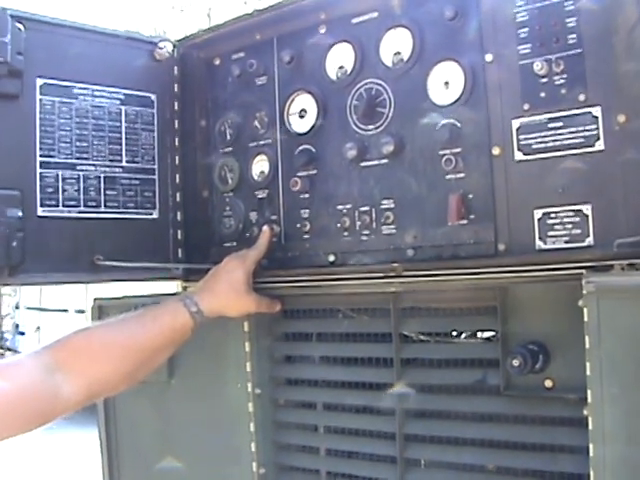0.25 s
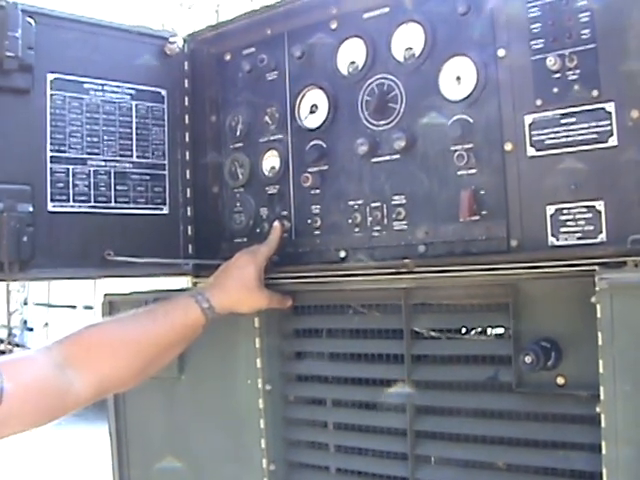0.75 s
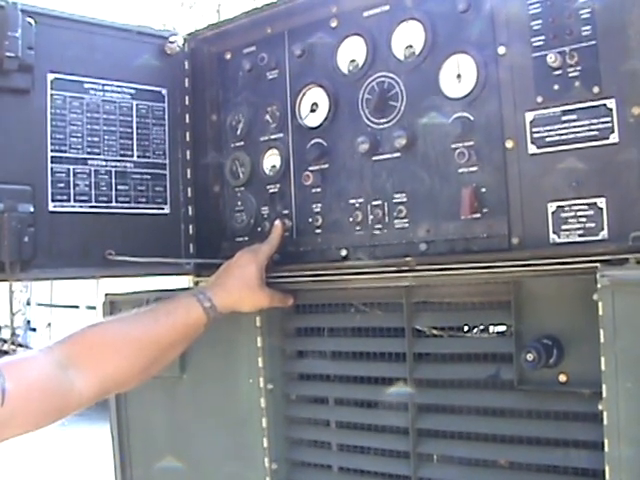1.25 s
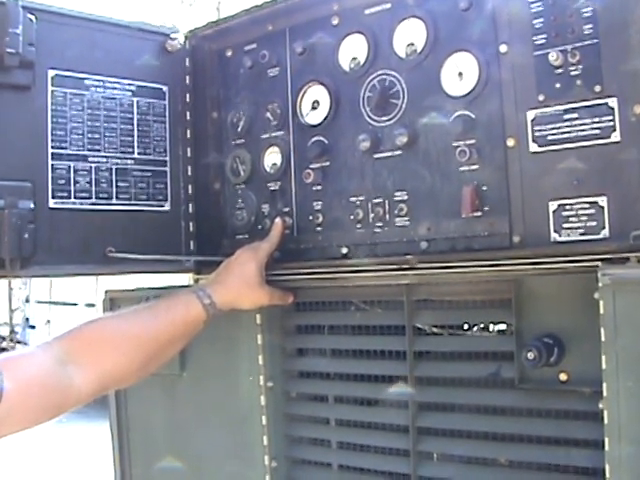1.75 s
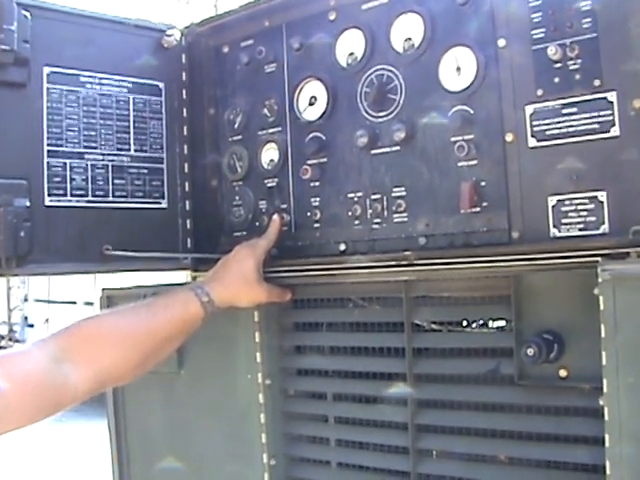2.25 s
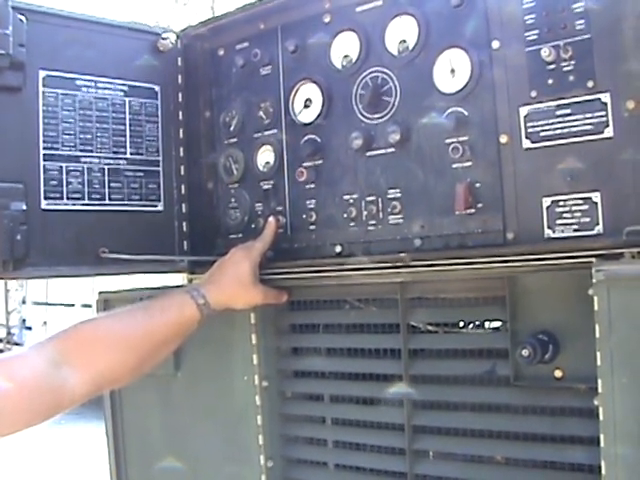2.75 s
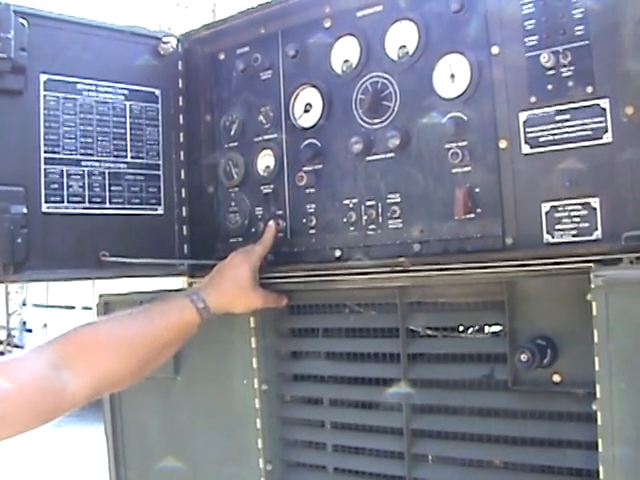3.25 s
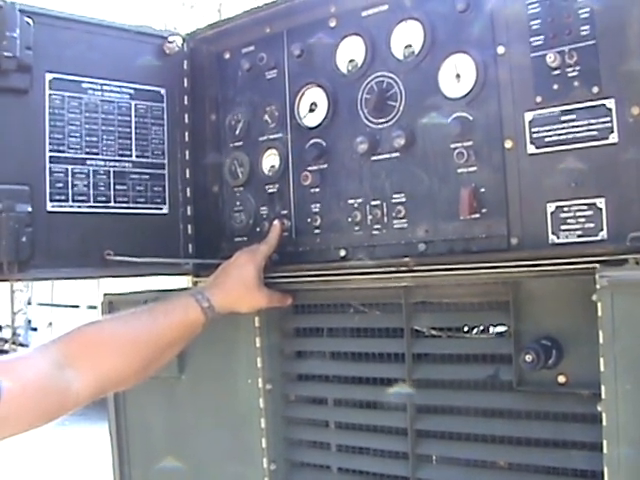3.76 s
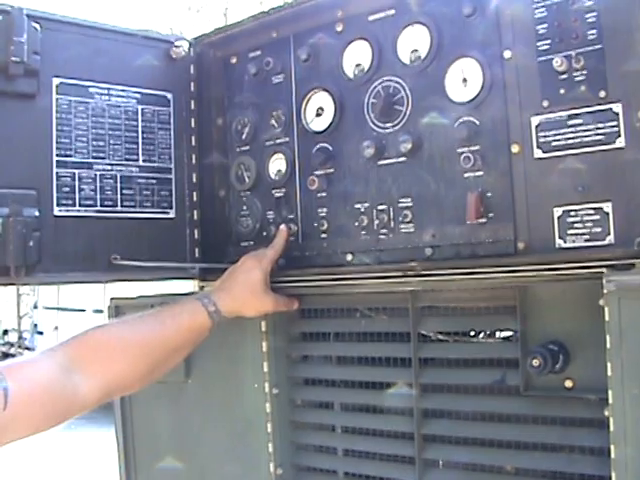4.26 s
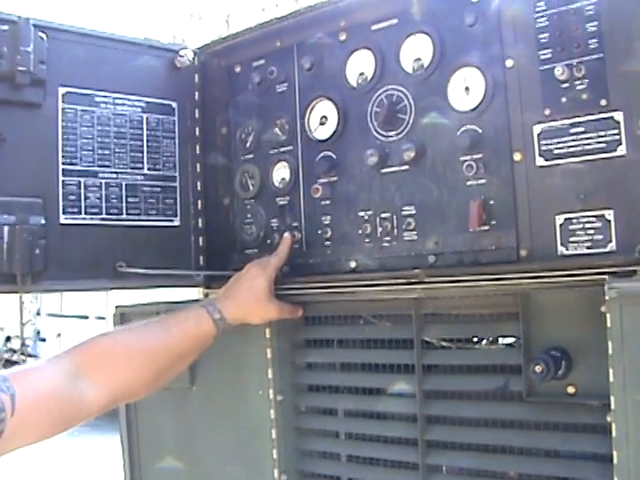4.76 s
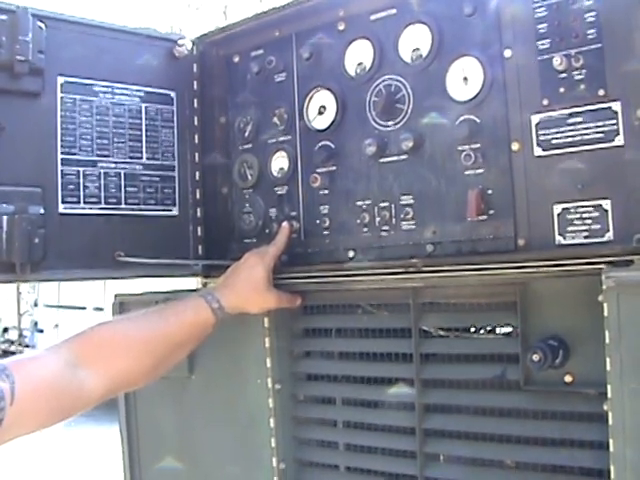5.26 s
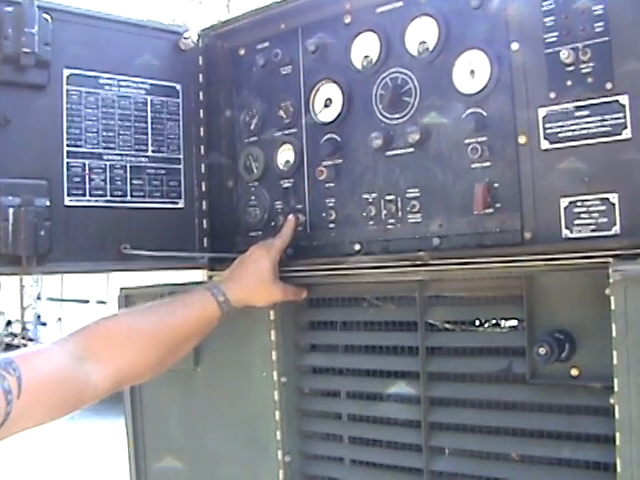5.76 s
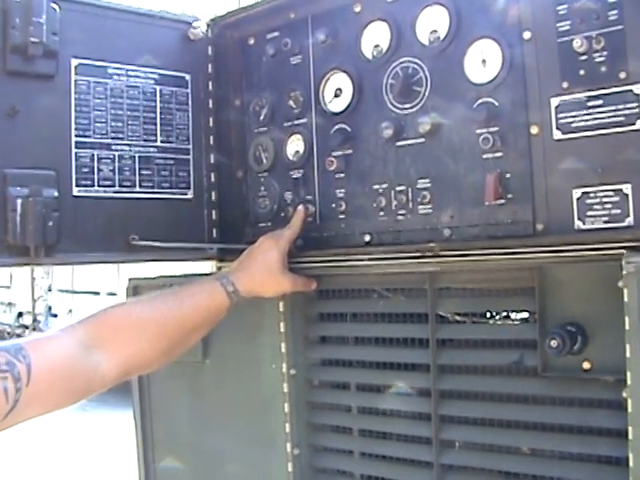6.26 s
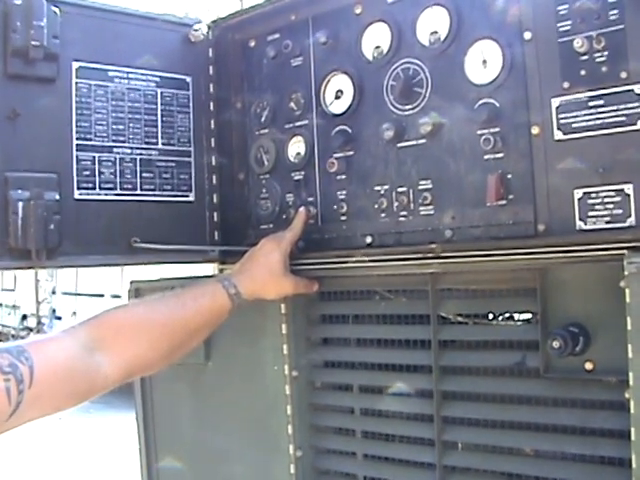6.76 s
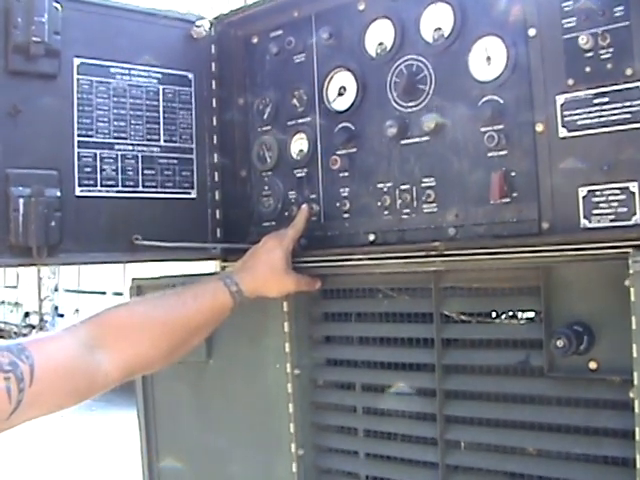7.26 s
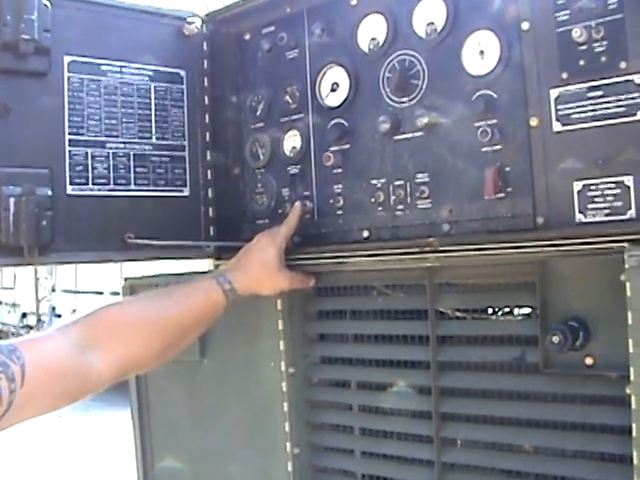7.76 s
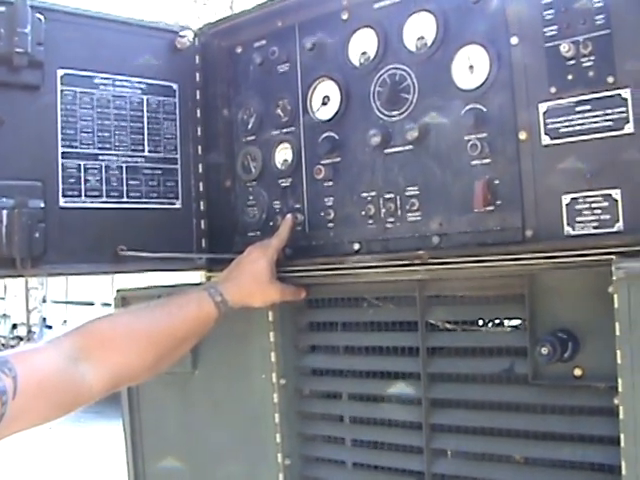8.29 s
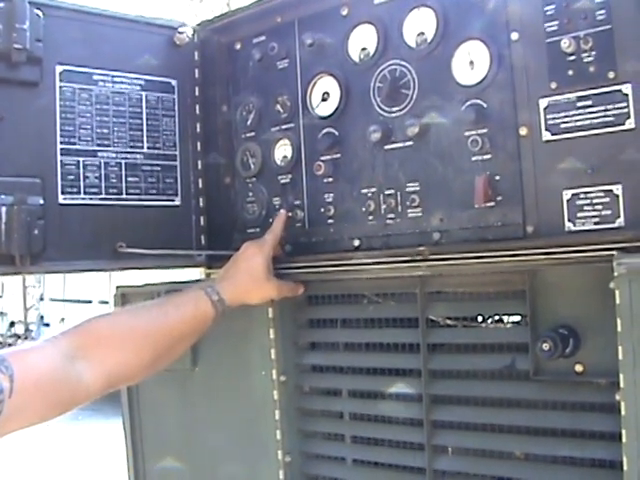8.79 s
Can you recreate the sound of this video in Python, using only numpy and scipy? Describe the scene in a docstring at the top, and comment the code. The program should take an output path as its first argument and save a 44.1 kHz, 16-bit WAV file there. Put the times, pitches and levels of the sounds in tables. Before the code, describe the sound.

A close, loud diesel generator revs up just after starting, then settles into a steady, clattering idle.

```python
"""A six-cylinder diesel generator has just caught: it overshoots, then the governor settles it to idle. The
exhaust drones and barks twice, firings knock the block, injectors tick, the valve gear clatters, the fan rushes
and a steel panel rings. A thin hiss swells as the speed settles; later, loose metal scrapes twice. Heard close
to the louvred steel housing, loud, its peaks held flat at full scale."""
import sys
import numpy as np
from scipy import signal
from scipy.fft import rfft, irfft
from scipy.io import wavfile
from scipy.ndimage import uniform_filter1d, minimum_filter1d

SR = 44100
rng = np.random.default_rng(int(sys.argv[2]) if len(sys.argv) > 2 else 0)


def dump_mix(stems):
    """Bounce the given channels to the path in sys.argv[1] as a 16-bit WAV at rate SR."""
    frames = np.atleast_2d(stems).T  # one column per channel
    limited = np.clip(frames, -1, 1)  # hard clip at full scale
    pcm = np.round(limited * 32767).astype(np.int16)
    wavfile.write(sys.argv[1], SR, pcm)


N = 398223
TIME_S = np.arange(N) / SR
BINS_HZ = np.maximum(np.arange(N // 2 + 1) * SR / N, 1)
IDLE_FIRING_HZ, WARMUP_S = 58.9505, 5.5


def undb(db):
    """Decibels to gain."""
    return 10 ** (np.asarray(db) / 20)


def unit(x):
    """Scale to unit rms."""
    return x / np.sqrt(np.mean(x ** 2))


def contour(table):
    """Columns of a frequency table, interpolated on a log axis."""
    hz, *columns = np.transpose(table)
    return [np.interp(np.log(BINS_HZ), np.log(hz), column) for column in columns]


def filtered(x, response):
    """Apply a frequency response."""
    return irfft(rfft(x) * response, N)


def noise(response):
    """Coloured noise, unit rms."""
    return unit(filtered(rng.standard_normal(N), response))


def walk(rate_hz):
    """Smooth random drift, unit rms."""
    return noise(np.exp(-BINS_HZ / rate_hz))


def resonance(f, hz, width_hz):
    """One damped mode, unit gain at its centre."""
    return 1 / (1 + 1j * (f * f - hz * hz) / (f * width_hz))


def reflections(decay_s):
    """Response of a dense, fading echo cluster with unit energy."""
    t = np.arange(SR // 5) / SR
    echoes = rng.standard_normal(len(t)) * np.exp(-t / decay_s)
    return rfft(echoes / np.linalg.norm(echoes), N)


def governor(t, swing_hz=28.686, half_period_s=2.2424, settle_s=0.4522, drag_hz=0.9261, thin_s=1.8665):
    """Firing rate in Hz: a damped overshoot, then a creep up to idle as the cold oil thins."""
    swing = swing_hz * np.exp(-t / settle_s) * np.sin(np.pi * t / half_period_s)
    return IDLE_FIRING_HZ + swing - drag_hz * np.exp(-t / thin_s)


def fuel_db(start_db=0.5, start_s=0.085, cut_db_per_hz=2.4, lag_s=0.12):
    """Fuel per firing against idle: rich at the start, then cut, a little late, on overspeed."""
    overspeed_hz = np.maximum(governor(np.maximum(TIME_S - lag_s, 0)) - IDLE_FIRING_HZ, 0)
    return start_db * np.exp(-(TIME_S / start_s) ** 2) - cut_db_per_hz * overspeed_hz


def drive_db(idle_db, db_per_fuel_db, cold_db):
    """A part's drive follows the fuel and shifts as the engine warms."""
    return idle_db + db_per_fuel_db * fuel_db() + cold_db * np.exp(-TIME_S / WARMUP_S)


def blows(firings, table, decay_s, rise_s, rel_width, floor_db, tone_db, fresh_db, scatter_db, jitter_s):
    """Blows recurring every six firings: one mode plus a noisy crowd, slightly different each time."""
    size = 4096
    t = np.arange(size) / SR
    f = np.maximum(np.arange(size // 2 + 1) * SR / size, 1)
    envelope = np.exp(-t / decay_s) * (1 - np.exp(-t / rise_s))
    cycles = np.arange(int(firings[-1] / 6) + 1) * 6
    out = np.zeros(N + size)
    for place, db, cold_db, hz in table:
        late, strength = rng.standard_normal((len(cycles), 2)).T
        starts = np.interp(cycles + place, firings, np.arange(N), right=2 * N) + jitter_s * SR * late
        grain = rng.standard_normal(size) + undb(fresh_db) * rng.standard_normal((len(cycles), size))
        colour = undb(floor_db) + np.abs(resonance(f, hz, rel_width * hz))
        crowd = unit(irfft(rfft(grain) * colour, size))
        mode = np.sqrt(2) * np.sin(2 * np.pi * hz * t)
        rings = unit(envelope * (crowd + undb(tone_db) * mode))
        gains = undb(db + cold_db * np.exp(-starts / SR / WARMUP_S) + scatter_db * strength)
        for start, ring, gain in zip(np.maximum(starts, 0).astype(int), rings, gains):
            if start < N:
                out[start:start + size] += gain * ring
    return out[:N]


# Silencer tones. Each drive: warm idle in dB, dB per dB of fuel, cold offset in dB.
HUM_DRIVE = (-20, 0.35, 0.88)
BOOM_DRIVE = (-14, -0.21, -0.24)
OVERTONE_DRIVE = (-18, 0.1, -5)
# Exhaust and frame shake. Each row: whole or half crank order, idle level in dB, racing level in dB.
DRONE_ORDERS = [(3, -31, -32), (4, -40, -40), (4.5, -41, -36), (5, -32, -28), (5.5, -35.5, -46),
                (7, -38, -30), (8.5, -51, -36), (10, -38.5, -33), (10.5, -47, -26.5), (11, -34, -45),
                (13, -48, -42), (13.5, -30, -29.5), (14, -35.5, -36), (14.5, -40, -37), (16, -37, -35),
                (17, -37, -37), (18, -36, -32.5), (21, -42.5, -50), (24, -35.5, -51)]


def exhaust(firing_hz, crank_rad, pipe_hz=183.9, pipe_width_hz=14.7, waver_db=0.35):
    """Four-stroke drone; the silencer sounds at two, three and four times the firing rate."""
    hum = undb(drive_db(*HUM_DRIVE)) * np.sin(6 * crank_rad)
    overtone = undb(drive_db(*OVERTONE_DRIVE)) * np.sin(12 * crank_rad)
    pipe_gain = np.abs(resonance(3 * firing_hz, pipe_hz, pipe_width_hz))
    # A quarter-cycle lag smooths the pulses into a drone.
    boom = -undb(drive_db(*BOOM_DRIVE)) * pipe_gain * np.cos(9 * crank_rad)
    racing = np.clip((firing_hz - 59) / 4, 0, 1)
    out = hum + boom + overtone
    for order, idle_db, racing_db in DRONE_ORDERS:
        wave = np.sin(order * crank_rad + rng.uniform(0, 2 * np.pi))
        out += undb(idle_db + racing * (racing_db - idle_db)) * wave
    return np.sqrt(2) * out * undb(waver_db * walk(16))


# Block and cover modes. Each row: frequency in Hz, width in Hz, relative level in dB.
BLOCK_MODES = [(668, 21, 0.5), (807, 17, 7), (986, 48, 1.5), (1034, 37, 0.5), (1133, 34, 0.5),
               (1203, 25, 3), (1462, 40, 0.5), (1634, 77, -1), (1724, 90, -4), (1940, 95, -7)]
# Blows of one cycle. Each row: place in firings, relative level in dB, cold offset in dB, centre in Hz.
KNOCK_BLOWS = [(0.198, -2.5, 1, 1018), (0.77, -1, 0, 1110), (1.299, 0, -5.5, 1006), (1.619, 0, 4.5, 983),
               (2.48, -3, 4.5, 997), (2.87, -4.5, 6.5, 1120), (3.45, -2, -2, 985), (3.88, -4, 2, 1203),
               (4.68, 3.5, -6, 988), (5.15, -1, -1.5, 1110)]
COVER_BLOWS = [(0.652, 0.5, 6, 1738), (1.35, 1, 3.5, 687), (1.849, 2, -2, 1605), (2.619, -1.5, 0, 1620),
               (3.548, 0, -4, 1610), (4.151, 3, -8, 1480), (4.75, 2, 2, 1810), (5.378, 0, 3.5, 1718)]
# Each drive: warm idle in dB, dB per dB of fuel, cold offset in dB.
KNOCK_DRIVE = (-18, 1, -0.4)
COVER_DRIVE = (-24.5, 0.15, 1.5)


def combustion(firings):
    """Diesel knock rings the block and sets its sheet-metal covers pinging."""
    power = sum(np.abs(undb(db) * resonance(BINS_HZ, hz, width)) ** 2 for hz, width, db in BLOCK_MODES)
    block = np.sqrt(power)
    knocks = blows(firings, KNOCK_BLOWS, decay_s=0.0065, rise_s=0.0044, rel_width=0.2,
                   floor_db=-16.5, tone_db=1.5, fresh_db=-7, scatter_db=1, jitter_s=2e-5)
    pings = blows(firings, COVER_BLOWS, decay_s=0.007, rise_s=0.0015, rel_width=0.13,
                  floor_db=-19, tone_db=-11, fresh_db=-19.5, scatter_db=0.5, jitter_s=2e-5)
    knocks = unit(filtered(knocks, block)) * undb(drive_db(*KNOCK_DRIVE))
    pings = unit(filtered(pings, block)) * undb(drive_db(*COVER_DRIVE))
    return knocks + pings


# Valve and injector spectrum. Each row: frequency in Hz, relative gain in dB.
CLATTER_SPECTRUM = [(150, -27), (330, 7.5), (550, -5), (850, 0), (1350, -2.5), (1800, 1), (2700, -3),
                    (3600, -7), (5400, -13), (7800, -16), (10000, -23.5), (15500, -40)]
# Taps of one cycle. Each row: place in firings, relative level in dB, cold offset in dB, centre in Hz.
VALVE_BLOWS = [(0.098, 1.5, 2.5, 2466, ), (0.621, 0, 0.5, 377), (1.2, 4.5, -1.5, 5120), (1.9, 4, -5, 2703),
               (2.902, 1.5, 1.5, 409), (3.45, 2, 5, 3720), (4.0, 4, -0.5, 3234), (4.701, 2, 1, 2184),
               (5.48, 3, 2, 4330)]
# Warm idle in dB, dB per dB of fuel, cold offset in dB.
VALVE_DRIVE = (-21, 0.3, 0.56)


def valve_gear(firings, surge_db=0.54, edge_per_knock=0.96, edge_hz=7500):
    """Bright taps of wandering force; harder firing sharpens their edge."""
    taps = blows(firings, VALVE_BLOWS, decay_s=0.015, rise_s=0.001, rel_width=1,
                 floor_db=4.5, tone_db=-18.5, fresh_db=-9, scatter_db=1.93, jitter_s=1e-5)
    taps = unit(filtered(taps, undb(contour(CLATTER_SPECTRUM)[0])))
    edge = filtered(taps, 1 / (1 + (edge_hz / BINS_HZ) ** 4))
    knock_db = drive_db(*KNOCK_DRIVE)
    taps += edge * (undb(edge_per_knock * (knock_db - knock_db[-1])) - 1)
    return taps * undb(drive_db(*VALVE_DRIVE) + surge_db * walk(17))


# Ticks of one cycle. Each row: place in firings, relative level in dB, cold offset in dB, centre in Hz.
INJECTOR_BLOWS = [(0.121, 0.5, -6, 3880), (0.35, 3, 2, 5380), (1.65, -1, -16, 2356), (1.951, -12, -5, 2870),
                  (3.62, -3.5, 8, 2284), (3.979, 4, -3.5, 3300), (4.199, 5, -2, 5430),
                  (4.738, 1.5, 0, 2154), (5.139, -1, -1, 2400), (5.5, 6.5, 0, 4203), (5.721, 1, 3, 3820)]
# Warm idle in dB, dB per dB of fuel, cold offset in dB.
INJECTOR_DRIVE = (-29, 0.05, 0.88)


def injectors(firings, highpass_hz=1500):
    """Hard ticks, bunched in the second half of each cycle, give the diesel its beat."""
    ticks = blows(firings, INJECTOR_BLOWS, decay_s=0.0072, rise_s=0.00058, rel_width=0.35,
                  floor_db=-30, tone_db=-3, fresh_db=-7, scatter_db=1.2, jitter_s=1e-5)
    colour = undb(contour(CLATTER_SPECTRUM)[0]) / (1 + (highpass_hz / BINS_HZ) ** 4)
    return unit(filtered(ticks, colour)) * undb(drive_db(*INJECTOR_DRIVE))


# Air rush. Each row: frequency in Hz, relative density in dB.
RUSH_SPECTRUM = [(20, -36), (50, -9), (85, -13.5), (150, 1), (230, 1.5), (350, -2), (560, -4), (700, -2),
                 (1100, -2), (1800, -8), (2700, -7), (5000, -16), (8000, -29), (11000, -35.5), (15500, -47)]
# Blade hum. Each row: fan shaft order, level in dB.
BLADE_ORDERS = [(5, -35.5), (6, -34.5), (7, -31.5), (8, -34), (9, -40), (13, -42.5), (16, -43.5)]


def fan(firing_hz, crank_rad, belt_ratio=1.0992, rush_db=-17, flutter_db=0.5, beat_db=-32.5,
        roar_hz=900, roar_db_per_hz=0.1):
    """Belt-driven blades hum and push air through the louvres; the low roar grows with speed."""
    rush = noise(undb(contour(RUSH_SPECTRUM)[0]))
    roar = filtered(rush, 1 / (1 + (BINS_HZ / roar_hz) ** 4))
    rush += roar * (undb(roar_db_per_hz * (firing_hz - firing_hz[-1])) - 1)
    shaft_rad = belt_ratio * crank_rad
    hum = sum(undb(db) * np.sin(order * shaft_rad + rng.uniform(0, 2 * np.pi))
              for order, db in BLADE_ORDERS)
    beat = undb(beat_db) * np.sin(11 * shaft_rad)  # throbs against the exhaust's 12th order
    return rush * undb(rush_db + flutter_db * walk(30)) + np.sqrt(2) * (hum + beat)


# Panel modes. Each row: frequency in Hz, width in Hz, relative level in dB.
PANEL_MODES = [(1676, 10, 0), (1843, 12, -7), (2003, 16, -9), (2238, 18, -11), (2680, 18, -12)]
# Panel envelope. Each row: time in seconds, level in dB.
PANEL_ENVELOPE = [(0, -32), (1.5, -29.5), (1.9, -23.5), (3.3, -23.5), (3.8, -26), (5.6, -26), (6.2, -28),
                  (9, -29)]


def panel(firings, first_firing=2.6):
    """One blow a cycle keeps a steel panel ringing, loudest just after the speed settles."""
    places = np.arange(first_firing, firings[-1], 6)
    hits = np.zeros(N)
    hits[np.searchsorted(firings, places)] = 1
    # Integrated, so each mode starts from rest without a click.
    modes = sum(undb(db) * resonance(BINS_HZ, hz, width) * hz / (1j * BINS_HZ)
                for hz, width, db in PANEL_MODES)
    level_db = np.interp(TIME_S, *np.transpose(PANEL_ENVELOPE))
    return unit(filtered(hits, modes)) * undb(level_db)


# Exhaust barks. Each row: peak time in seconds, half-width in seconds, crank order, level in dB.
BARK_SWELLS = [(0.21, 0.11, 13, -22.5), (0.57, 0.24, 12, -27.5)]


def exhaust_barks(crank_rad):
    """Exhaust overtones swell briefly and glide with the speed."""
    out = np.zeros(N)
    for peak_s, half_width_s, order, db in BARK_SWELLS:
        swell = np.exp(-((TIME_S - peak_s) / half_width_s) ** 2)
        out += undb(db) * swell * np.sin(order * crank_rad)
    return np.sqrt(2) * out


def hiss(peak_s=2.2, half_width_s=0.3, centre_hz=9000, width_hz=2600, level_db=-42):
    """A thin hiss swells and fades."""
    swell = np.exp(-((TIME_S - peak_s) / half_width_s) ** 2)
    return undb(level_db) * swell * noise(resonance(BINS_HZ, centre_hz, width_hz) ** 2)


# Metal scrapes. Each row: start in seconds, level in dB, decay in seconds.
SCRAPES = [(5.162, -18, .014), (5.179, -15, 0.024)]


def loose_metal(centre_hz=5200, width_hz=4600, lowpass_hz=9000):
    """A loose part chatters: two quick bright scrapes."""
    envelope = sum(undb(db) * (TIME_S >= start_s) * np.exp(-np.abs(TIME_S - start_s) / decay_s)
                   for start_s, db, decay_s in SCRAPES)
    colour = resonance(BINS_HZ, centre_hz, width_hz) ** 2 * np.exp(-(BINS_HZ / lowpass_hz) ** 2)
    return envelope * noise(colour)


def housing(x, echo_db=-10, decay_s=0.026, highpass_hz=1600):
    """Treble bounces inside the steel housing and comes out metallic."""
    wet = undb(echo_db) / (1 + (highpass_hz / BINS_HZ) ** 2)
    return filtered(x, (1 + wet * reflections(decay_s)) / np.sqrt(1 + wet ** 2))


# Left port against right. Each row: frequency in Hz, level in dB, phase lead in radians.
PORT_BALANCE = [(60, -14, 0), (120, -9.5, 0.54), (201, -8, 0.44), (388, -6, 0.69), (646, -2, 0.61),
                (910, -1.5, 0.29), (2420, -2.5, 0.31), (6000, -1.5, 0.36), (15000, -1, 0.13)]


def microphone(x, scatter_db=-16, decay_s=0.16, highpass_hz=260):
    """Two close ports, the left thin in the bass; the open doors scatter differently into each."""
    side = undb(scatter_db) * reflections(decay_s) / (1 + (highpass_hz / BINS_HZ) ** 2)
    left_db, lead_rad = contour(PORT_BALANCE)
    ratio = undb(left_db) * np.exp(1j * lead_rad)
    right = 2 / np.abs(1 + ratio)
    return np.array([filtered(x, right * ratio * (1 + side)), filtered(x, right * (1 - side))])


def scene():
    """One crankshaft times the engine and fan; the bright, noisy parts echo in the housing."""
    firing_hz = governor(TIME_S)
    firings = np.cumsum(firing_hz) / SR
    crank_rad = 2 * np.pi * firings / 3  # three firings per turn
    direct = exhaust(firing_hz, crank_rad) + combustion(firings) + injectors(firings)
    direct += panel(firings) + exhaust_barks(crank_rad)
    enclosed = valve_gear(firings) + fan(firing_hz, crank_rad) + hiss() + loose_metal()
    return microphone(direct + housing(enclosed))


def record(dry, ceiling=0.99, window_samples=96, lowpass_hz=15700):
    """Fast limiter per channel, then clipping and a steep low-pass."""
    needed = ceiling / np.maximum(np.abs(dry), ceiling)
    gain = uniform_filter1d(minimum_filter1d(needed, window_samples), window_samples)
    lowpass = signal.ellip(10, 0.1, 70, lowpass_hz, fs=SR, output="sos")
    return signal.sosfilt(lowpass, np.clip(dry * gain, -1, 1))


dry = scene()
out = record(dry)
dump_mix(out)
```